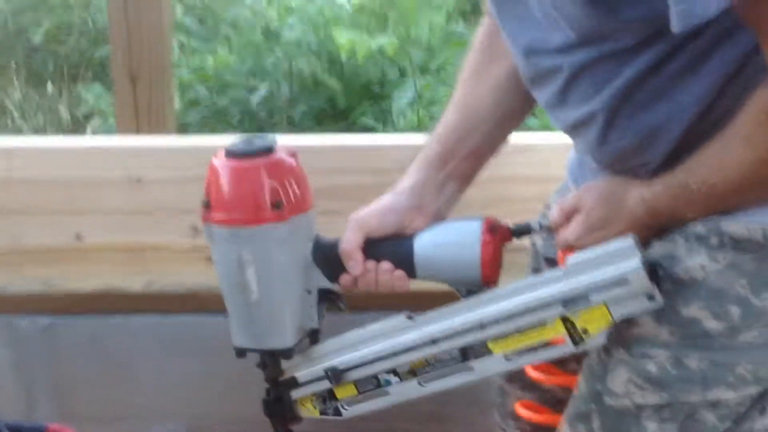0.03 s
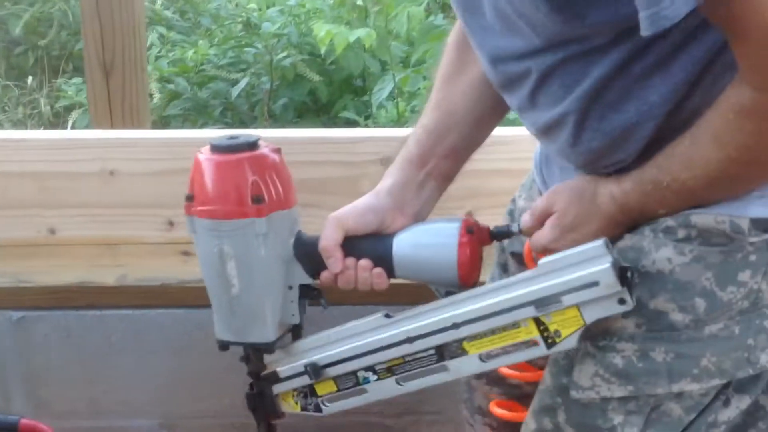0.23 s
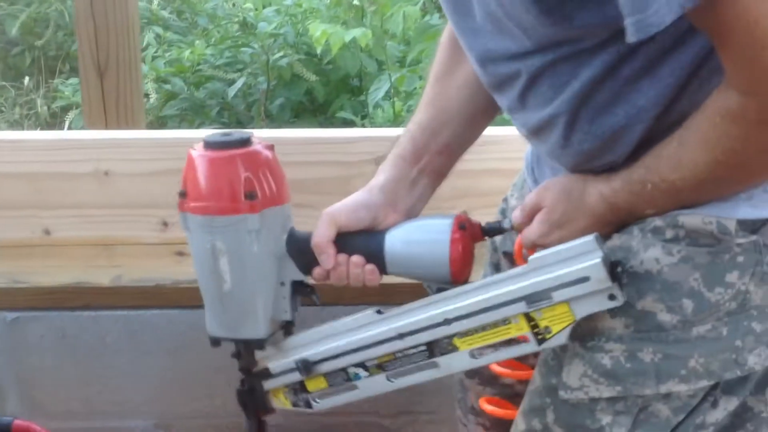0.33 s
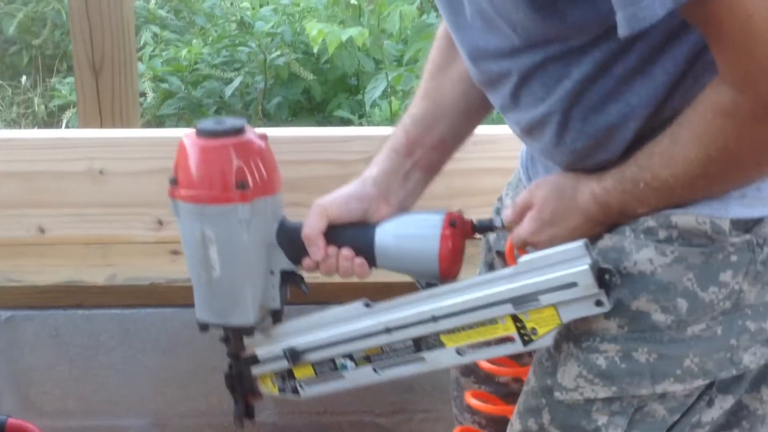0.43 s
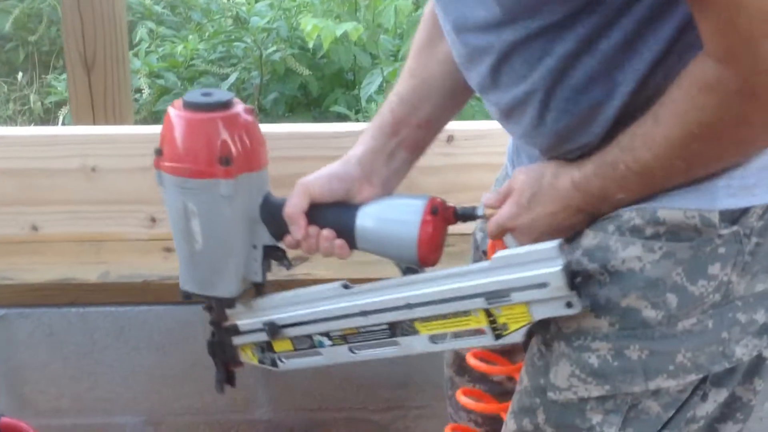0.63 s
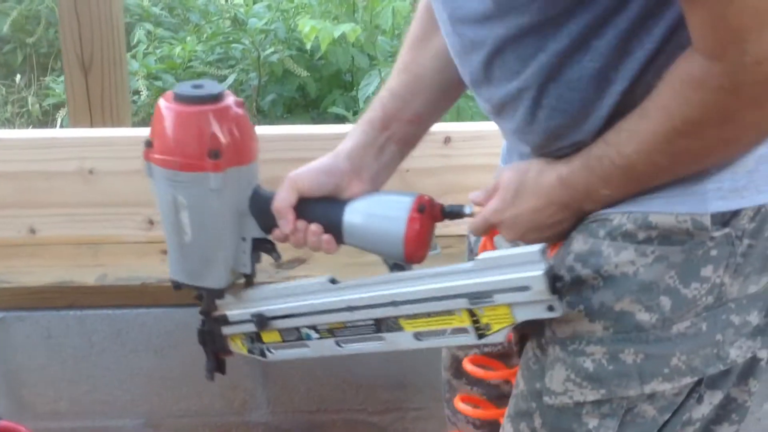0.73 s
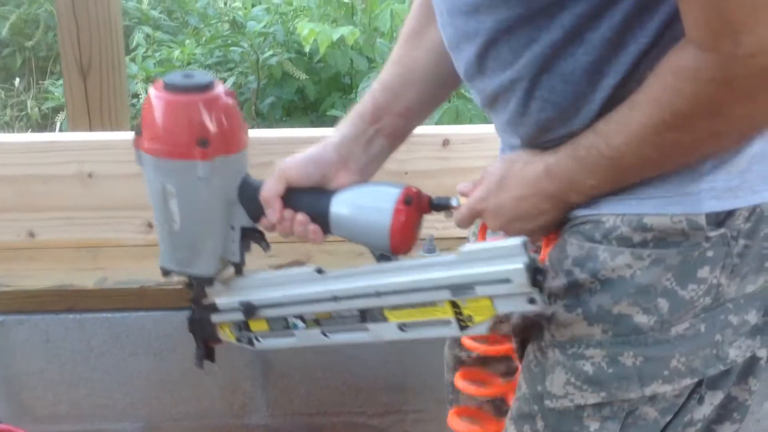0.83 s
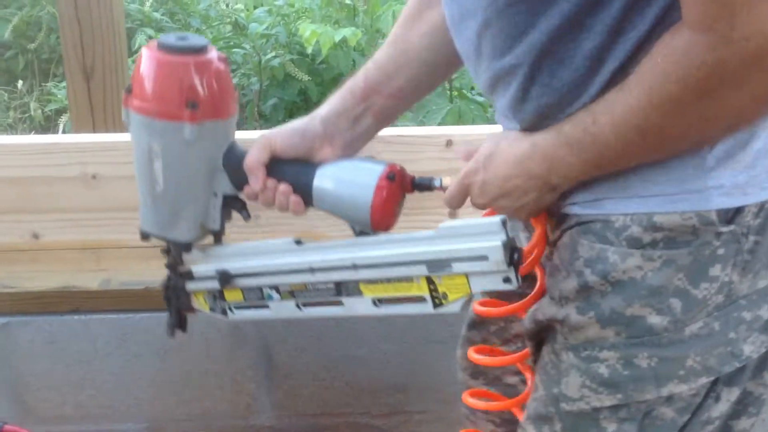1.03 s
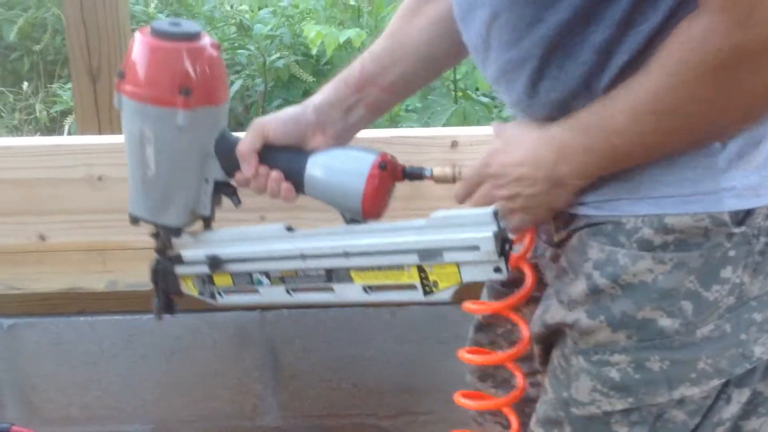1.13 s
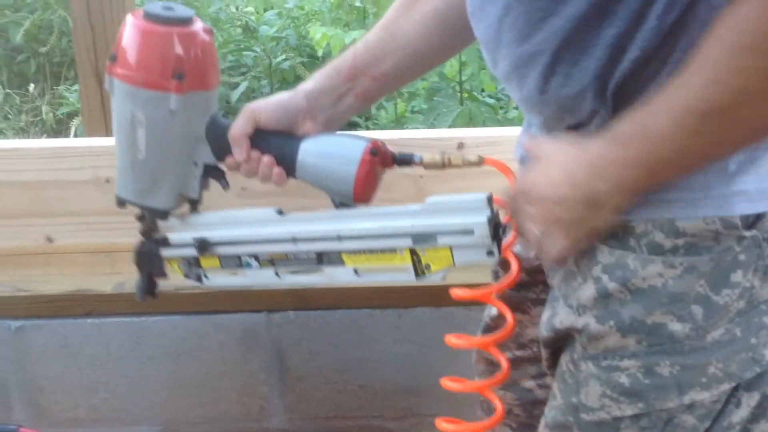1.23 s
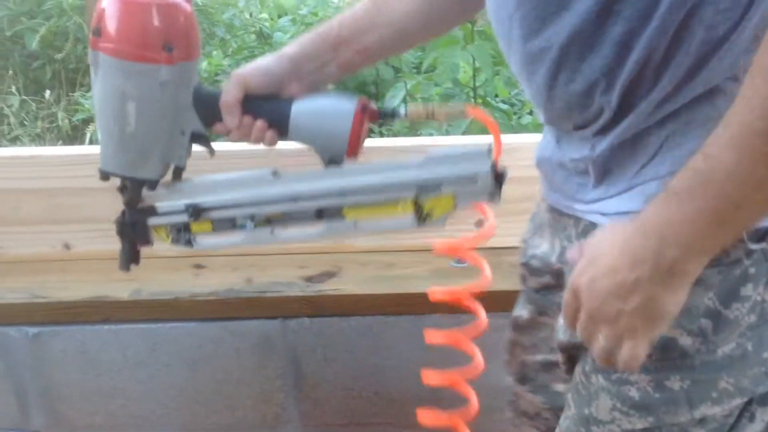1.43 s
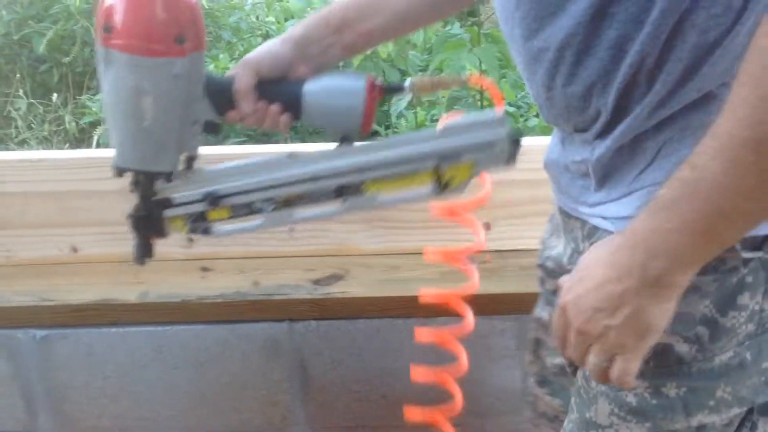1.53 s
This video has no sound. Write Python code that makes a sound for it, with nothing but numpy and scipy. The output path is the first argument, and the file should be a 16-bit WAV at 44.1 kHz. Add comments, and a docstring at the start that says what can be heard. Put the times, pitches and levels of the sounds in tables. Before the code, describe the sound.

Sharp metallic snap of an air coupling, preceded by a tiny knock and mixed with a burst of escaping air; thin hiss dwindles, small metal ticks follow, over soft outdoor air, faint motor hum and insects, recorded close.

```python
"""An air hose coupler is pushed onto the inlet of a nail gun, outdoors beside a low wall.
Over a steady yard of murmuring air, motor hum lines and insect bands of noise, a light knock comes first.
Filtered noise spits past the opening valve while impacts snap the sleeve home and ring the tool's modes.
A thin leak of resonant noise whistles and dies away; the metal shifts in the grip with a few more knocks.
At the end clothes rustle softly as slowly swelling noise."""
import sys
import numpy as np
from scipy import signal
from scipy.fft import rfft, irfft
from scipy.io import wavfile
from scipy.ndimage import uniform_filter1d

SR = 44100
rng = np.random.default_rng(int(sys.argv[2]) if len(sys.argv) > 2 else 0)


def transcribe(u):
    """Save the signal u as a 16-bit wav file named by the first command-line argument.

    u: samples, shape (n,) or (channels, n), limited to [-1, 1]; the rate is SR.
    q: integer samples, one column per channel.
    """
    v = np.clip(np.atleast_2d(u).T, -1, 1)
    q = np.round(v * 32767).astype(np.int16)
    wavfile.write(sys.argv[1], SR, q)


N = 70560  # samples, 1.6 s


def undb(db):
    """Level to amplitude: twenty decibels make a factor of ten."""
    return 10 ** (np.asarray(db) / 20)


def unit(x):
    """Power normalization: scale a signal to rms 1."""
    return x / np.sqrt(np.mean(x ** 2))


def noise():
    """White noise: equal mean power at every frequency."""
    return rng.standard_normal(N)


def walk(rate_hz):
    """Random modulation: held random values, smoothed twice, drift slowly with rms 1."""
    hold = int(SR / rate_hz)
    steps = noise()[np.arange(N) // hold]
    return unit(uniform_filter1d(uniform_filter1d(steps, hold), hold))


def fade(t, start, time_constant):
    """Exponential decay: a sudden start, then a fall to 1/e in each time constant."""
    return (t >= start) * np.exp(-np.maximum(t - start, 0) / time_constant)


def colour(x, points):
    """Minimum-phase filtering: the spectrum follows (Hz, dB) points, with unit gain for white noise."""
    hz, db = np.array(points, float).T
    f = np.maximum(np.fft.rfftfreq(2 * N, 1 / SR), 1)
    gain = undb(np.interp(np.log(f), np.log(hz), db))
    # folding the cepstrum onto positive time makes the filter causal
    cepstrum = irfft(np.log(gain))
    cepstrum[1:N] *= 2
    cepstrum[N + 1:] = 0
    response = np.exp(rfft(cepstrum))
    power_gain = np.mean(abs(response) ** 2)
    return irfft(rfft(x, 2 * N) * response / np.sqrt(power_gain))[:N]


def resonate(x, hz, width):
    """Simple resonance: a band-pass with gain 1 at its centre."""
    b, a = signal.iirpeak(min(hz, SR / 2 - 1), hz / width, fs=SR)
    return signal.lfilter(b, a, x)


def resonant_noise(hz, width):
    """Cascaded resonance: noise through two equal band-passes gains steeper skirts."""
    return resonate(resonate(noise(), hz, width), hz, width)


def band(hz, width):
    """Narrow-band noise: a steep resonance brought to rms 1."""
    return unit(resonant_noise(hz, width))


def contact(t, start, scrape_s):
    """Impact and friction: a unit impulse of force followed by a decaying noisy scrape."""
    scrape_gain = 0.16  # relative to the blow
    force = scrape_gain * noise() * fade(t, start, scrape_s) / np.sqrt(scrape_s * SR / 2)
    force[int(start * SR)] += 1
    return force


def ring(t, force, modes):
    """Modal superposition: a force drives decaying modes (Hz, dB, t60), heard as velocity."""
    response = 0
    for hz, db, t60 in modes:
        decay = np.exp(-np.log(1000) * t / t60)
        response = response + undb(db) * np.cos(2 * np.pi * hz * t) * decay
    return signal.fftconvolve(force, response)[:N]


# Contacts of coupler and tool. Each row: start in seconds, relative level in dB,
# extra drive of the body ring in dB, decay time of the scrape in seconds.
SNAP_CONTACTS = [(.2125, -20, -13, .002), (0.221, -10.5, 0, 0.0036), (0.2231, -17, 2, 0.0072),
                 (0.2435, -1.5, -0.5, 0.0023), (0.2462, -4.5, 2.5, 0.0026), (0.2475, -4, 5, 0.0063),
                 (0.2511, -4, -3, 0.0083), (.257, -7.5, -10.5, .004)]
# Modes of the tool body. Each row: frequency in Hz, relative level in dB,
# t60 in seconds, relative level in dB when lightly nudged.
BODY_MODES = [(186, -46, 0.093, -34), (303, -6.5, .08, -10), (576, -3.5, 0.052, -35),
              (697, -12.5, 0.11, -33), (1111, -10, 0.091, -22), (1414, -10, 0.084, 4), (1566, 4, .06, -14),
              (1657, 1.5, 0.063, -2.5), (1709, 3, 0.041, -2.5), (1840, -21, .05, -22),
              (1912, -10.5, 0.083, -16), (2060, -12, 0.099, 1.5), (2210, -29, 0.067, -23),
              (2730, -10.5, 0.094, -12), (3300, -51, 0.034, -9), (3543, -6.5, 0.086, -10)]
# Colour of a metal contact. Each row: frequency in Hz, relative level in dB.
CRACK_COLOUR = [(40, -40), (100, -21.5), (180, -1.5), (600, -2.5), (1000, -8), (1700, 9.5), (2500, -0.5),
                (3700, 0.5), (6000, -16.5), (15000, -6)]
RING_DB, CRACK_DB = -21.5, -21  # gains
CRACK_DECAY_S = .009


def latch(t):
    """Impact excitation: plug, locking balls and sleeve strike; each contact cracks and rings the tool."""
    force, crack_envelope = 0, 0
    for start, db, body_db, scrape_s in SNAP_CONTACTS:
        force = force + undb(db + body_db) * contact(t, start, scrape_s)
        crack_envelope = crack_envelope + undb(db) * fade(t, start, CRACK_DECAY_S)
    struck_modes = [(hz, db, t60) for hz, db, t60, _ in BODY_MODES]
    body = undb(RING_DB) * ring(t, force, struck_modes)
    crack = undb(CRACK_DB) * colour(crack_envelope * noise(), CRACK_COLOUR)
    return body + crack


# The spit of air. Each row: frequency in Hz, relative level in dB.
SPIT_COLOUR = [(40, -32), (100, -35), (250, -14), (900, -8), (1600, -4), (3500, -8), (5000, -3),
               (8500, -2.5), (11500, 3.5), (15000, -0.6)]
OPEN_S, SEAL_S = .2138, 0.2468
SPIT_ATTACK_S, SPIT_RELEASE_S, SPIT_DB = 0.0033, .013, -19.5


def spit(t):
    """Turbulent jet noise: air escapes from the valve's opening, then decays once the seal closes."""
    opening = np.clip((t - OPEN_S) / SPIT_ATTACK_S, 0, 1)
    closing = np.exp(-np.maximum(t - SEAL_S, 0) / SPIT_RELEASE_S)
    flutter_db = 1.0 * walk(244.5)
    return colour(noise(), SPIT_COLOUR) * opening * closing * undb(SPIT_DB + flutter_db)


# Resonances of the gap. Each row: frequency in Hz, width of one resonance pass in Hz, relative level in dB.
GAP_RESONANCES = [(1874, 150, -8), (3142, 170, -1), (4985, 37, 3), (5334, 264, 3.5), (5814, 520, 0.5),
                  (7180, 150, 4.5), (7850, 1240, -2), (9800, 360, -4), (10720, 1600, -6.5),
                  (12840, 190, -11), (13600, 1600, -20)]
# Broad rush of the leak. Each row: frequency in Hz, relative level in dB.
RUSH_COLOUR = [(100, -20), (300, -26), (1300, 0), (2500, -5.5), (4000, 1.5), (6300, 2), (8800, -9.5),
               (11000, 0), (15000, -2)]
# Breathy whistles. Each row: time of greatest strength in seconds, time from there to 1/e in seconds,
# frequency in Hz, level in dB against the hiss.
PASSING_WHISTLES = [(0.358, 0.17, 3286, -10.5), (.42, 0.2, 5350, -5.5), (.52, 0.15, 9600, -10),
                    (0.852, 0.082, 7140, -8), (1.04, 0.15, 3170, -9.5)]
WHISTLE_WIDTH_HZ = 65  # of one resonance pass
LEAK_DB, LEAK_FLUTTER_DB = -43, -0.15
LEAK_START_S, LEAK_RISE_S, LEAK_HOLD_S = 0.21, 0.018, 0.51
LEAK_FADE_DB_PER_S = 12  # after the hold
LEAK_CLOSE_S, LEAK_END_S = 0.86, 1.61  # straight fall towards zero
RUSH_DB, RUSH_FADE_DB_PER_S = -2, 5.5  # against the hiss


def leak(t):
    """Flow noise and resonance: air seeping past the seal rushes, hisses and whistles as it dwindles."""
    opening = np.clip((t - LEAK_START_S) / LEAK_RISE_S, 0, 1)
    closing = np.clip((LEAK_END_S - t) / (LEAK_END_S - LEAK_CLOSE_S), 0, 1)
    fall_db = LEAK_FADE_DB_PER_S * np.maximum(t - LEAK_HOLD_S, 0)
    flow = opening * closing * undb(LEAK_DB - fall_db + LEAK_FLUTTER_DB * walk(59.6))
    hiss = unit(sum(undb(db + 2.0 * walk(20.13)) * resonant_noise(hz, width)
                    for hz, width, db in GAP_RESONANCES))
    rush_db = RUSH_DB - RUSH_FADE_DB_PER_S * (t - LEAK_START_S)
    rush = colour(noise(), RUSH_COLOUR) * undb(rush_db)
    whistles = 0
    for peak_s, half_s, hz, db in PASSING_WHISTLES:
        swell = np.exp(-((t - peak_s) / half_s) ** 2)
        whistles = whistles + band(hz, WHISTLE_WIDTH_HZ) * undb(db) * swell
    return flow * (hiss + rush + whistles)


# Small shifts of the coupler. Each row: start in seconds, relative level in dB,
# decay time of scrape and tick in seconds.
SHIFT_CONTACTS = [(0.1674, -11.5, 0.027), (.503, -3.5, 0.0056), (0.5131, -0.5, 0.002),
                  (0.516, -3.5, 0.0019), (0.569, -18, 0.0066), (0.577, -12, 0.0063)]
# Colour of a light knock. Each row: frequency in Hz, relative level in dB.
TICK_COLOUR = [(100, -38), (800, -20), (1700, 20), (2600, 7.5), (3600, 8.5), (4800, 4), (15000, -4)]
SHIFT_RING_DB, SHIFT_TICK_DB = -40, -36  # gains


def shifts(t):
    """Light modal excitation: the coupler knocks on the inlet, rousing the modes in other proportions."""
    force, tick_envelope = 0, 0
    for start, db, decay_s in SHIFT_CONTACTS:
        force = force + undb(db) * contact(t, start, decay_s)
        tick_envelope = tick_envelope + undb(db) * fade(t, start, decay_s)
    nudged_modes = [(hz, nudged_db, t60) for hz, _, t60, nudged_db in BODY_MODES]
    body = undb(SHIFT_RING_DB) * ring(t, force, nudged_modes)
    tick = undb(SHIFT_TICK_DB) * colour(tick_envelope * noise(), TICK_COLOUR)
    return body + tick


# Brushing clothes. Each row: frequency in Hz, relative level in dB.
RUSTLE_COLOUR = [(100, -43), (400, 5.5), (700, 4), (1200, -3.5), (2200, -29), (6000, -9), (15000, -35)]
RUSTLE_PEAK_S, RUSTLE_HALF_S, RUSTLE_DB = 1.52, 0.15, -59


def rustle(t):
    """Friction noise: clothes brush softly as the hand lets go and the tool is lifted."""
    swell = np.exp(-((t - RUSTLE_PEAK_S) / RUSTLE_HALF_S) ** 2)
    return colour(noise(), RUSTLE_COLOUR) * swell * undb(RUSTLE_DB + 2.5 * walk(44))


# Murmur of the yard. Each row: frequency in Hz, relative level in dB.
AIR_COLOUR = [(25, -25), (60, -10.5), (100, -12.5), (170, 1), (215, -1), (260, 0.5), (320, -4.5), (380, 3),
              (470, -7.5), (600, -5), (1000, -9), (2200, -16.5), (4500, -23), (10000, -23.5), (15000, -21)]
# Motor lines. Each row: frequency in Hz, level in dB.
MOTOR_LINES = [(240.7, -55), (268, -61.5)]
# Insect chorus. Each row: frequency in Hz, width of one resonance pass in Hz, level in dB.
INSECT_BANDS = [(7660, 1080, -56.5), (13330, 3800, -61.5), (5160, 730, -72)]
AIR_DB, AIR_RISE_DB_PER_S = -52.5, 0.44


def yard(t):
    """Incoherent addition: murmuring air, a slightly wavering motor hum and a steady insect chorus."""
    air_db = AIR_DB + AIR_RISE_DB_PER_S * t + 0.3 * walk(6.65)
    air = colour(noise(), AIR_COLOUR) * undb(air_db)
    hum = 0
    for hz, db in MOTOR_LINES:
        level = undb(db + 1.46 * walk(11.74))
        wavering_hz = hz * (1 + 0.0047 * walk(15))
        phase = 2 * np.pi * np.cumsum(wavering_hz) / SR
        hum = hum + level * np.sqrt(2) * np.sin(phase)
    insects = sum(band(hz, width) * undb(db + 1.05 * walk(69.6)) for hz, width, db in INSECT_BANDS)
    return air + hum + insects


WALL_DELAY_S, WALL_DB = .0024, -6.5
TAIL_START_S, TAIL_T60_S, TAIL_DB = .008, 0.14, -14


def reflect(jet):
    """Specular reflection: a surface close by returns a weaker, delayed copy of the jet."""
    return undb(WALL_DB) * np.roll(jet, int(WALL_DELAY_S * SR))


def scatter(t, source):
    """Diffuse reflection: the surroundings answer with an exponentially decaying noisy tail."""
    echoes = noise() * fade(t, TAIL_START_S, TAIL_T60_S / np.log(1000))
    echoes = echoes / np.sqrt(np.sum(echoes ** 2))
    return undb(TAIL_DB) * signal.fftconvolve(source, echoes)[:N]


def scene():
    """Superposition: tool and jet with their reflections, plus the leak, the clothes and the yard."""
    t = np.arange(N) / SR
    jet = spit(t)
    tool = latch(t) + shifts(t) + jet + reflect(jet)
    mix = tool + scatter(t, tool) + leak(t) + rustle(t) + yard(t)
    return mix[None]


LOW_CUT_HZ, TOP_HZ = 121, 15250


def record(dry):
    """Band limiting: a high-pass thins the deep bass and an elliptic low-pass cuts the top steeply."""
    high_pass = signal.butter(2, LOW_CUT_HZ, "high", fs=SR, output="sos")
    low_pass = signal.ellip(12, .2, 80, TOP_HZ, fs=SR, output="sos")  # ripple and stop-band depth in dB
    return signal.sosfilt(low_pass, signal.sosfilt(high_pass, dry))


dry = scene()
out = record(dry)
transcribe(out)
```